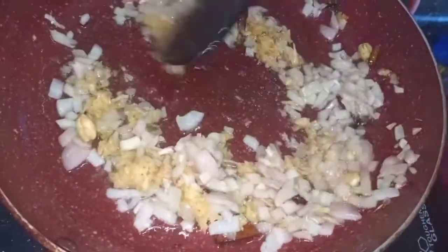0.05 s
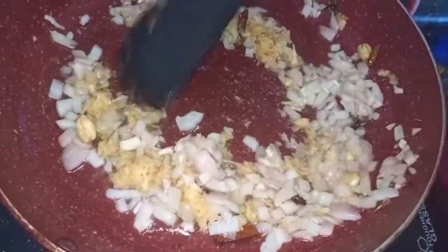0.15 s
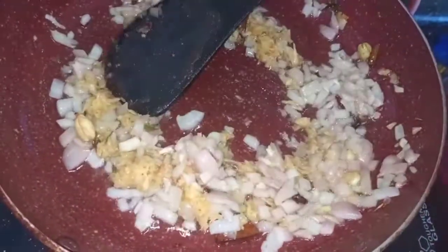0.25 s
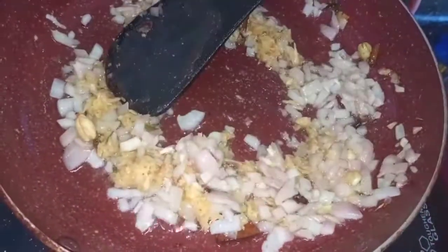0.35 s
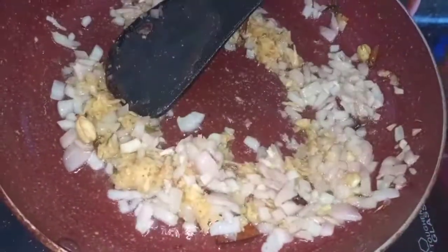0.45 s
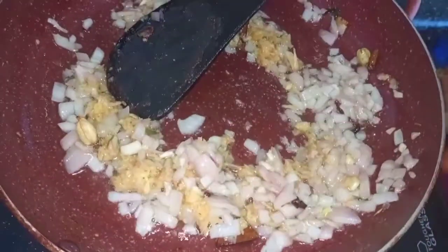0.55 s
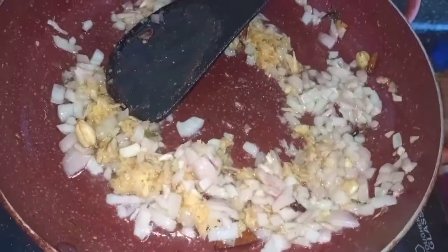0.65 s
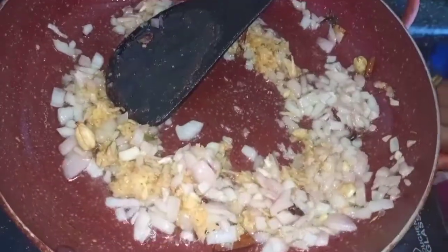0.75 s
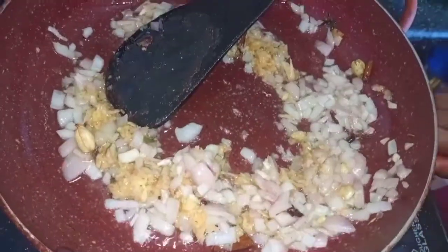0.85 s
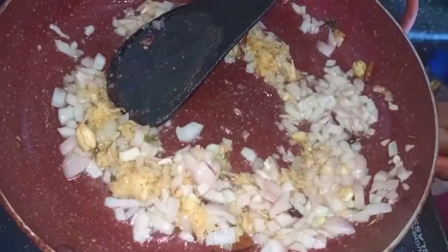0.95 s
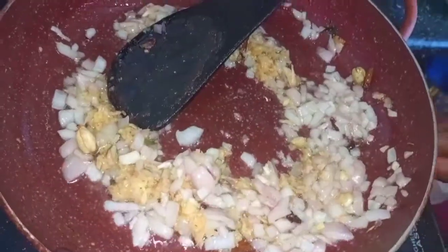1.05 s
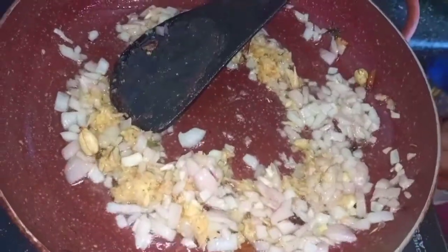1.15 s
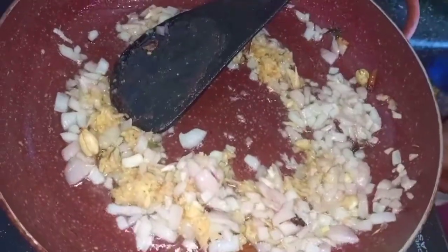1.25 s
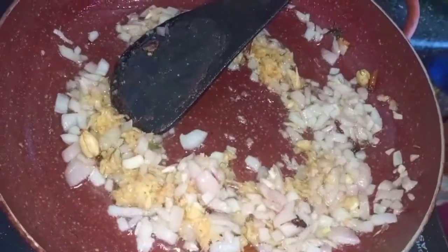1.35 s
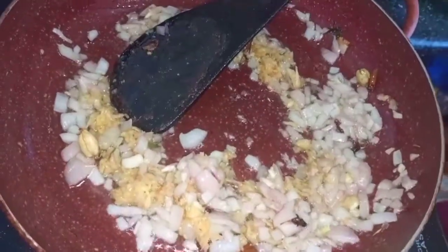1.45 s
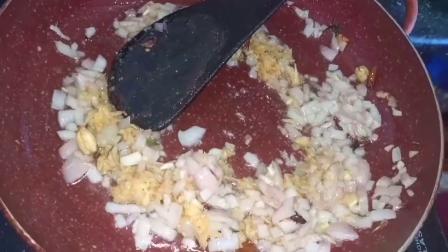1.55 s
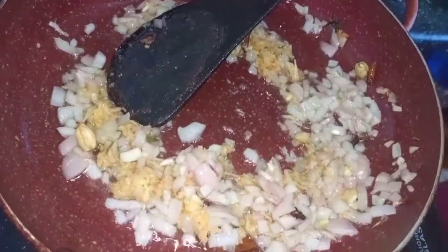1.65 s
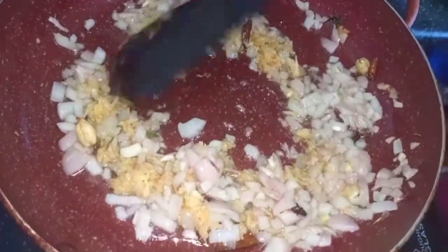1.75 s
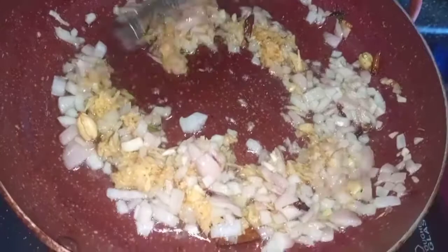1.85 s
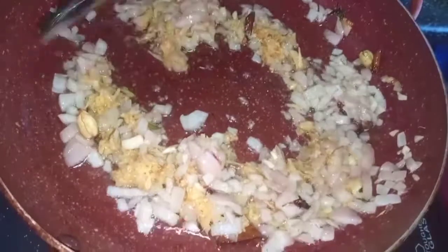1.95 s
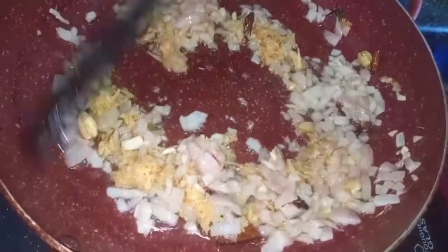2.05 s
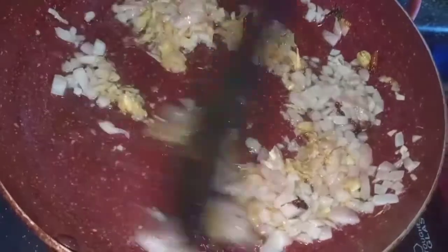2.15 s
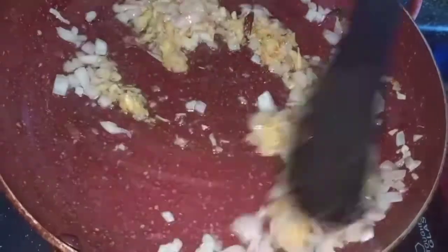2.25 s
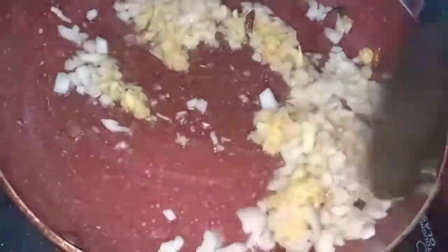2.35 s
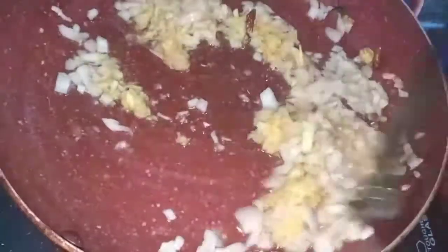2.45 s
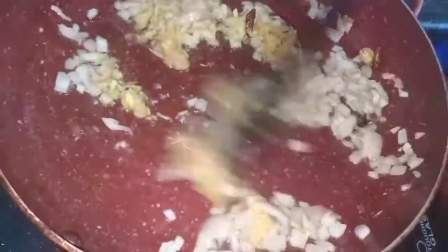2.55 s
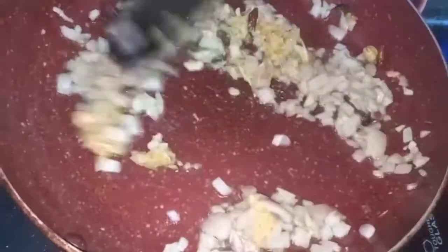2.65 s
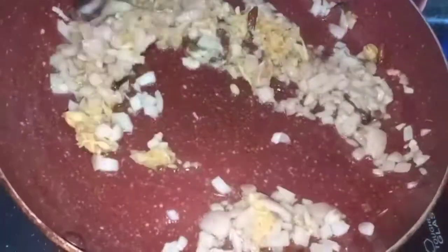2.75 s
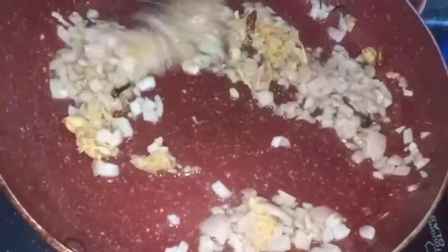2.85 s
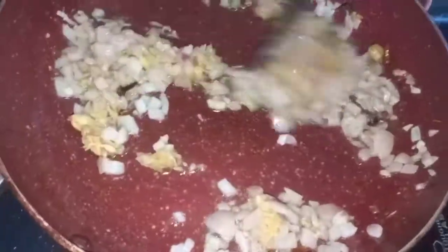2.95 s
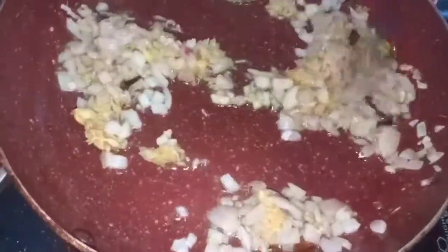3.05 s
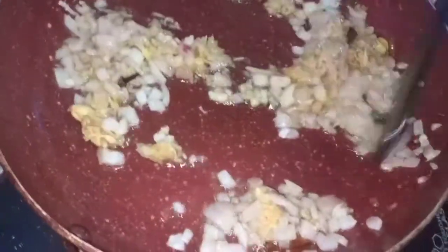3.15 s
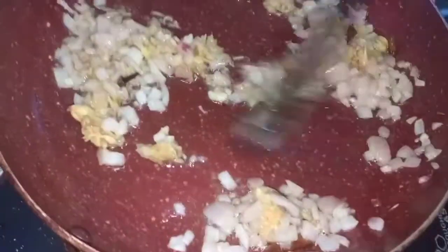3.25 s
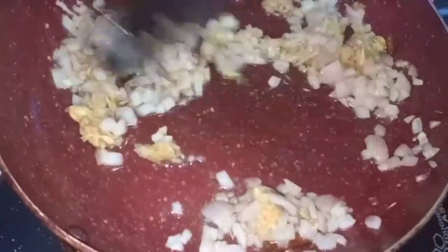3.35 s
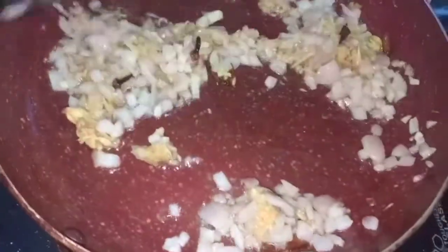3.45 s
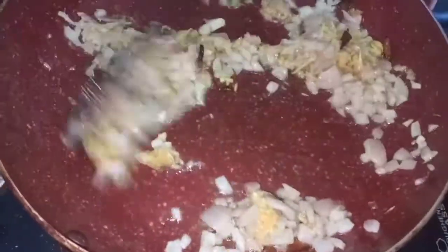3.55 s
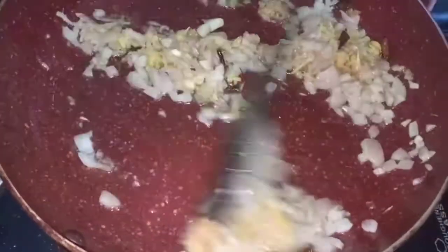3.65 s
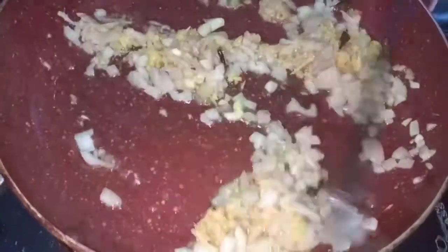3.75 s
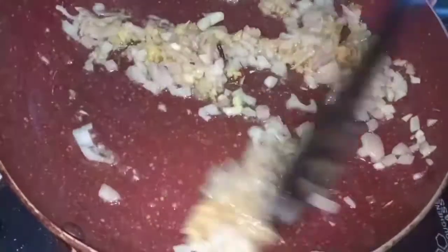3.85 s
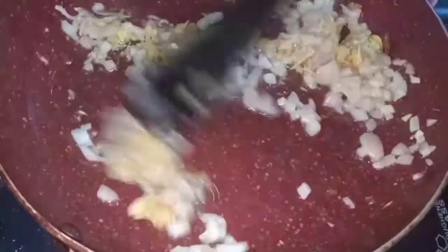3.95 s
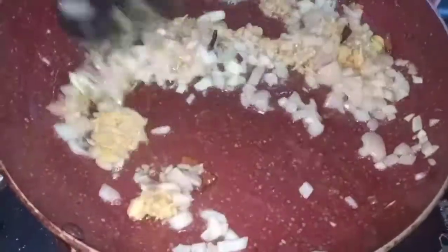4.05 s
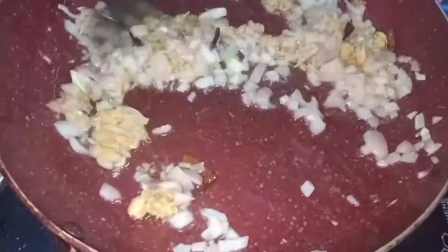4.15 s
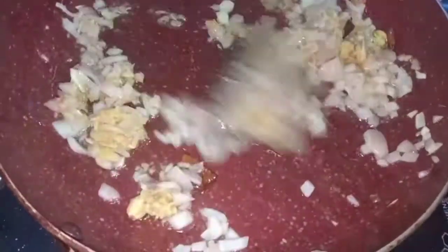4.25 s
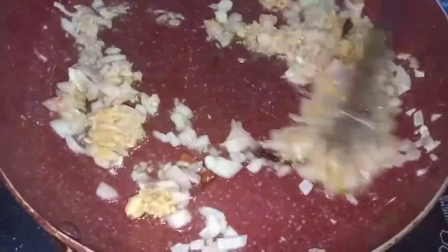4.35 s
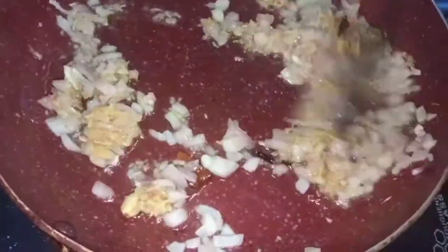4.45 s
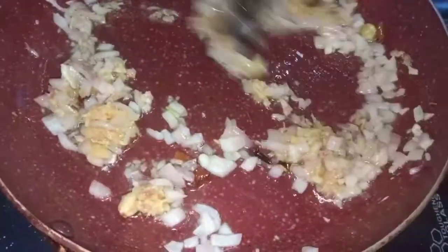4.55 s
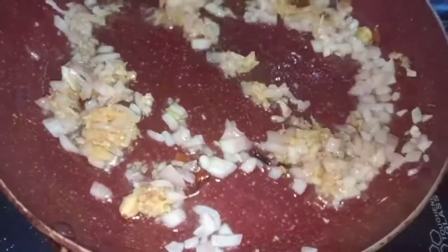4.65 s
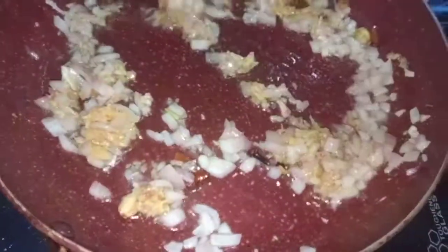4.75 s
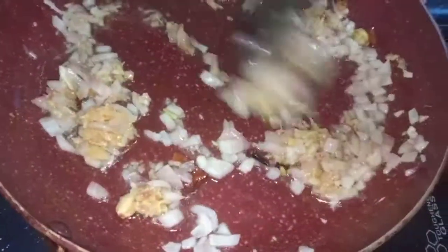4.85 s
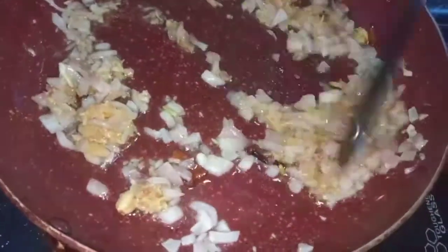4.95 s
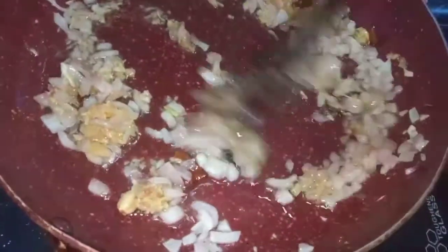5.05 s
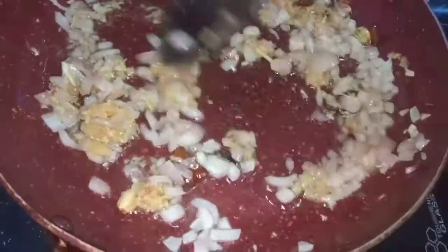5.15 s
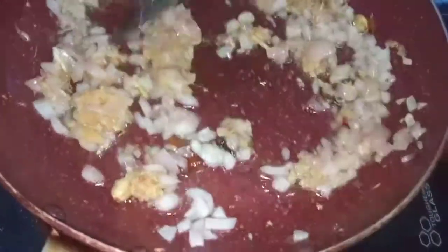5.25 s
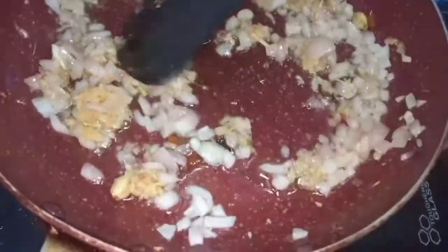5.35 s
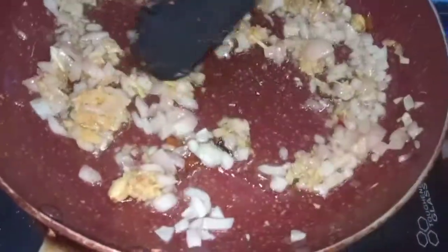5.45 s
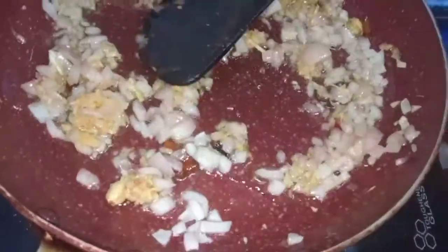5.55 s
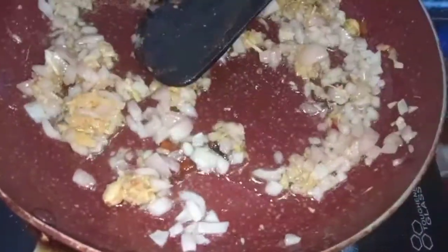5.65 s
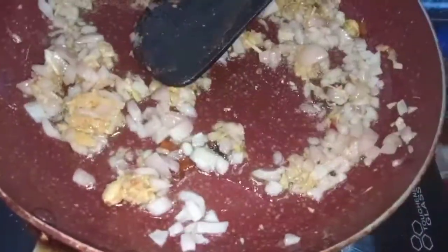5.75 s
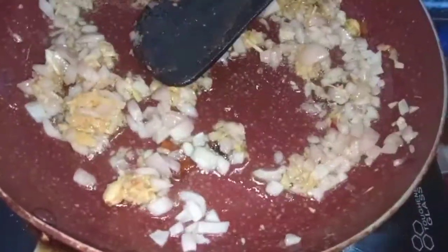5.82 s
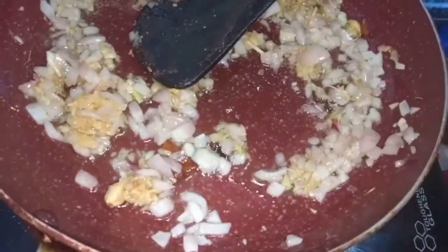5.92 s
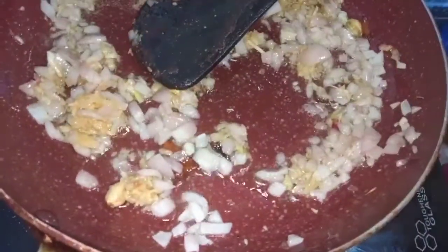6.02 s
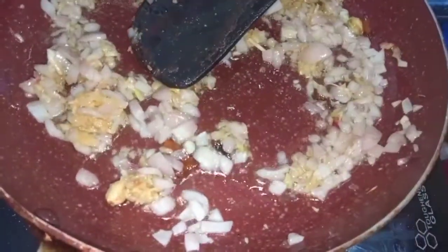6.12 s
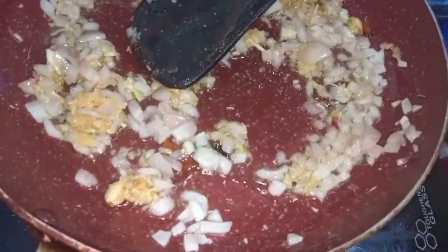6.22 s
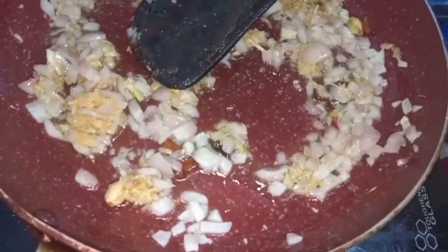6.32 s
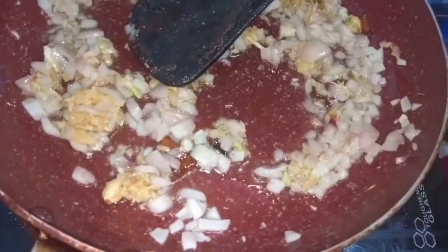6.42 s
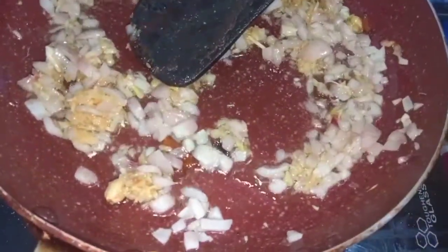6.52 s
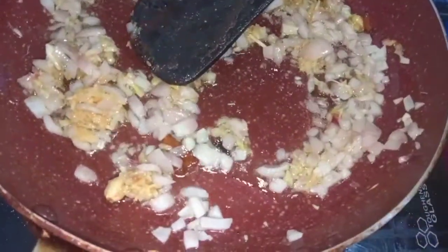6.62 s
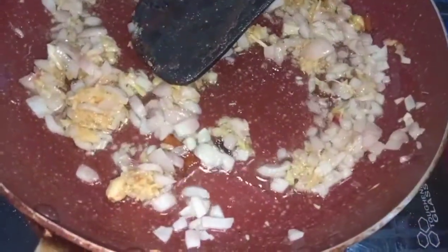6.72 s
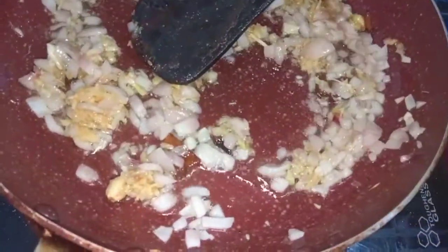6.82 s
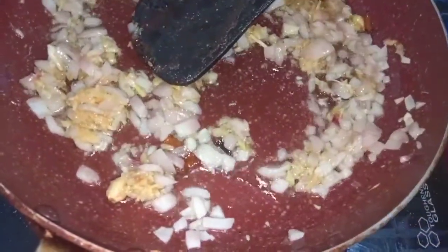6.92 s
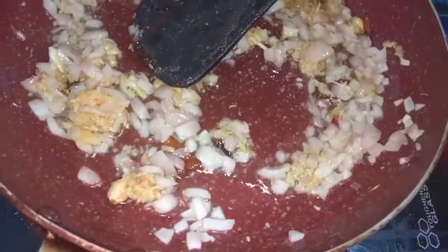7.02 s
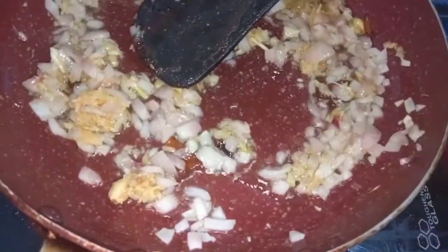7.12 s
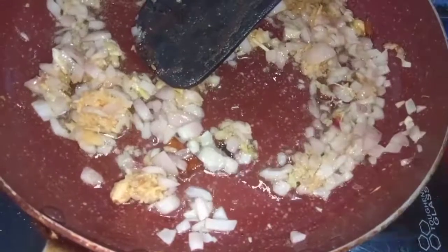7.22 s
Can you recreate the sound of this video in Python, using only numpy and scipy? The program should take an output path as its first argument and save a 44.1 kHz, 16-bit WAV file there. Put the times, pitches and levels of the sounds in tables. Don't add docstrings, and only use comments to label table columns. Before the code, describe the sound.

Steady wet sizzle of chopped onion frying in oil, with sharp spatula knocks, short scrapes and a late hollow clatter, heard close up.

```python
import sys
import numpy as np
from scipy import signal
from scipy.fft import rfft, irfft
from scipy.io import wavfile
from scipy.ndimage import uniform_filter1d, minimum_filter1d

SR = 44100
rng = np.random.default_rng(int(sys.argv[2]) if len(sys.argv) > 2 else 0)


def nominal_scale(level):
    x = np.asarray(level, float) / 20
    return 10 ** x


def persist_wave(psi):
    counts = np.round(np.clip(psi, -1, 1) * 32767).astype(np.int16)
    wavfile.write(sys.argv[1], SR, np.atleast_2d(counts).T)


N = 321224

# t [s], position among the seven grips [0-6]
GRIP_PATH = [(0, 0), (2.58, 0), (2.84, 1), (3.14, 1), (3.36, 2), (3.58, 2), (3.78, 3), (4.4, 3), (4.75, 4),
             (5.25, 4), (5.5, 5), (6.5, 6), (7.28, 6)]
# f [Hz], level [dB per Hz]
PORT_BODY = [
    [(530, -47.5), (900, -26), (1400, -26), (2270, -2.5), (2850, -13.5), (3700, -17), (4400, -31),
     (7150, -34)],
    [(530, -56), (900, -19), (1100, -16.5), (2200, -4), (2800, 5.5), (5500, -15), (7150, -67)],
    [(530, -25), (900, -6), (1260, -13), (1930, -2), (2800, 0.5), (5500, -13), (7150, -72)],
    [(530, -23.5), (900, -21.5), (1700, -12), (1980, -6.5), (3260, -1.5), (4000, -4.5), (5500, -33),
     (7150, -33)],
    [(530, -25), (900, -16), (1640, -10), (1820, -4.5), (2300, -1.5), (3240, 4), (5500, -9.5), (7150, -42)],
    [(530, -37), (900, -17), (1450, -18.5), (2070, -2), (2850, 1), (3940, -2), (5500, -20), (7150, -62)],
    [(530, -49), (900, -29), (1730, -21), (2850, -5.5), (3970, -12.5), (5500, -37), (7150, -66)],
]
# f [Hz], level [dB per Hz]
PORT_TREBLE = [
    [(4750, -17), (5610, -3.5), (6150, -7.5), (6640, 1.5), (7570, -14.5), (8340, -5.5), (9320, -14.5),
     (10200, -6), (11300, -11.5), (12200, -20.5)],
    [(2710, -11), (5720, -5.5), (6910, 2.5), (7800, -11), (9710, 0), (11600, -4), (13900, -14),
     (15500, -25)],
    [(4600, -1), (5200, -13), (6940, -6), (8010, -2), (8470, -3), (10200, -15.5), (13300, -8), (15500, -11)],
    [(2710, -35), (4600, -0.5), (5300, -18), (6180, -15.5), (7690, -18), (11400, -15), (13200, -22),
     (15500, -36)],
    [(2710, -39), (4600, -3), (5200, -23), (5930, -7.5), (7160, 0.5), (8600, -14), (11800, -7.5),
     (15500, -25)],
    [(2710, -45), (4600, -12), (5550, -15), (6870, 4.5), (7230, 1), (8680, -18.5), (11800, -14),
     (15500, -23)],
    [(4910, -18), (5580, -10.5), (6430, -9), (6840, -2), (7460, 3), (8550, -14), (11500, -6), (15500, -25)],
]
SPLIT_HZ = 3930
# sizzle treble level [dB], flame level [dB]
GRIP_LEVELS = [(-55, -46.5), (-50.5, -43), (-47, -44.5), (-51.5, -47.5), (-51.5, -52.5), (-46.5, -51),
               (-50, -49)]
GRIP_ECHO = [1, 1.5, 1.5, -0.5, -2.5, 4, -2]

# t [s], level [dB]
FRYING_VIGOUR = [(0, -40.5), (.28, -41.5), (.5, -41), (2.09, -41), (2.37, -42.5), (2.49, -42.5), (2.8, -36),
                 (2.97, -45), (3.28, -42.5), (3.42, -49.5), (3.6, -40), (3.79, -42.5), (4.05, -33.5),
                 (4.34, -39), (4.83, -41), (5.56, -37), (5.82, -39), (7.28, -38)]
USUAL_DB, TREBLE_FOLLOWS = -39.5, 0.44
# t [s], body gain [dB], treble gain [dB], fading time [s]
FLARE_UPS = [(.1, 7.5, 10.5, 0.017), (0.384, 14, -10, 0.016), (2.125, 4, 2.5, 0.28), (3.0, 11, 3.5, 0.18),
             (3.63, 10.5, 4.5, 0.22), (4.2, 5, 4, 0.011), (4.64, 7.5, 7, 0.065), (5.25, -2, 1, 0.02),
             (.7, 2.5, 2, 0.044), (.92, 1, 3, 0.024), (1.85, 1.5, 1, 0.044), (2.21, 3.5, 0, 0.046),
             (2.27, 5.5, -0.5, .03), (2.34, 3, -1, .04), (2.78, 0, 1.5, 0.023), (4.07, 3.5, 4, 0.059),
             (4.4, 1, -1, 0.034), (4.55, 3.5, 4, 0.04), (5.43, 3, -1, 0.049), (6.1, 2.5, 3, 0.046),
             (6.52, 1.5, -1, 0.028), (7.02, 0, 1.5, 0.022), (7.11, 1.5, 0, .03), (5.54, 0, -1.5, 0.077),
             (5.7, 0.5, 2, 0.22), (6.729, 10, 16, 0.018), (6.768, 11.5, 0, 0.02), (6.89, 1, 2.5, 0.043),
             (7.18, 1.5, 0.5, 0.036)]
FLARE_RISE_S = 0.013
BOILING_DB = 2.0
# f [Hz], level [dB per Hz]
HUM_SPECTRUM = [(18, -41), (30, -8.5), (48, -24), (66, -10.5), (108, 3), (140, -10), (194, -1.5),
                (252, -21.5), (299, -18.5), (371, -15), (414, -17.5), (590, -18.5), (1200, -19.5),
                (1560, -12.5), (2640, -120)]
# t [s], level above the flame [dB]
STOVE_JOLTS = [(.38, -5), (1.3, 3), (2.279, 9.5), (2.551, 6), (3.33, 1), (4.0, 14), (4.2, 5), (4.56, 5.5),
               (5.14, 10), (5.5, 1.5), (5.76, 6)]
JOLT_RISE_S, JOLT_FADE_S = 0.013, 0.05
# start t [s], length [s], level above the resting rustle [dB]
BLADE_DRAGS = [
    (.28, 0.22, -13),
    (2.1, 0.99, 23),
    (2.961, 0.17, 30),
    (3.592, 0.11, 35),
    (3.9, 0.21, 25),
    (5.6, 0.12, 14),
    (6.74, 0.31, -2),
]
RUSTLE_DB, DRAG_PEAK = -63.5, 0.41

# t [s], peak level [dB], f [Hz]
SMALL_SPITS = [(0.0965, -32, 6800), (0.2996, -9, 6100), (2.2145, -24, 8400), (2.5082, -26, 6400),
               (2.899, -17, 12400), (2.9097, -21, 6800), (3.29, -21, 7100), (3.512, -28, 7700),
               (3.6202, -36, 7800), (4.636, -8, 11000), (4.6358, 6, 3400), (5.4026, -31, 6850),
               (5.4725, -28, 7060), (5.71, -10, 6960), (5.7957, -19, 7300), (5.8396, -21, 7030),
               (6.0701, -21, 7230), (6.0903, -13, 7900), (6.318, -24, 6970), (6.343, -18, 7380),
               (6.5136, -17, 6700), (6.5685, -26, 7010), (6.725, -6, 8900), (6.766, -26, 7700),
               (7.007, -23, 7490), (7.113, -20, 7400), (7.173, -11, 3900), (.4796, -32, 6630),
               (0.652, -26, 6660), (.8912, -29, 6480), (.927, -26, 5000), (1.218, -35, 8400),
               (1.326, -32, 10100), (1.3347, -24, 8430), (1.4489, -32, 5350), (1.4819, -29, 5680),
               (1.7123, -31, 6700), (1.9478, -33, 6700), (2.2995, -32, 6610), (3.228, -28, 6000),
               (3.256, -30, 9800), (3.29, -24, 4500), (3.29, -30, 12500), (2.852, -31, 11300),
               (4.005, -25, 7800), (4.02, -28, 9000)]
# t [s], peak level [dB]
LARGE_SPITS = [(0.927, -17), (1.4522, -19), (1.847, -17), (1.849, -13), (1.9187, -19), (2.206, -13),
               (2.263, -33), (2.5955, -15), (2.7836, -18), (1.0944, -26), (4, -19), (4.095, -8),
               (4.4637, -12), (4.6358, -9), (4.637, -9), (5.2196, -20), (5.2421, -13), (5.4065, -15.5),
               (5.5295, -19.5), (5.7822, -20), (6.089, -14), (6.2126, -13.5), (6.365, -22), (6.5205, -15),
               (6.5404, -18), (6.6664, -15), (6.726, -6.5), (6.8801, -13.5), (6.9067, -20), (6.918, -21),
               (6.922, -19), (6.977, -10.5), (7.017, -17), (6.7305, -14), (2.266, -8.5), (4.074, -8),
               (4.126, -13), (7.173, -9.5), (7.199, -9.5)]
SPLASH_SHARE = 0.16

# t [s], crack peak [dB], crack f [Hz], pan thud above crack [dB], pan ring above crack [dB]
EDGE_SOFT_KNOCKS = [(0.0979, -10, 2500, -64, -22), (1.0952, -20, 950, -18, -30),
                    (1.1115, -29, 624, -22, -30), (1.1195, -35, 700, -20, -30),
                    (3.2902, -11, 1900, -20, -14), (1.4226, -30, 2300, -29, 4.5),
                    (1.4547, -19, 2140, -19, -3), (2.5451, -34, 2240, 5.5, -30),
                    (3.2982, -9.5, 1560, -8, -2.5), (3.583, -27, 1500, -6, 7), (3.592, -29, 1500, 6, 10),
                    (3.607, -25, 1300, -5, -3), (3.6597, -6, 2320, -26, -10), (3.9113, -6, 1950, -13, -9),
                    (3.9128, -8, 1700, -30, -10), (3.9177, -8, 1930, -13, -5.5),
                    (4.342, -17, 2240, -33, -28), (5.1222, -21, 1500, -5, 2), (5.3411, -29, 2800, -9.5, -1),
                    (5.501, -18, 2460, -52, -21), (5.629, -22, 2740, -15.5, -19)]
BLADE_FLAT_KNOCKS = [
    (.2980, 12, 2200, -50, -34),
    (.3771, -2.5, 2230, -25, -17),
]
EDGE_HARD_KNOCKS = [
    (2.1143, 9, 1900, -33, -8),
    (2.9009, 8, 1980, -25, -8),
    (4.2424, 7, 1950, -25, -10),
]
FLAT_CYCLES, HARD_CYCLES, SOFT_CYCLES = 2.34, 0.65, 0.4
# f [Hz], level [dB], t60 [s]
STAND_MODES = [(190, -16, 0.16), (266.7, -4, 0.17), (314, -1.5, 0.15), (390, -14, 0.11)]
# f [Hz], level [dB], t60 [s]
WALL_MODES = [(555, -14, .035), (628, -10, .035), (710, -11, .06), (860, -10, .035), (996, -10, .035),
              (1330, -12, .035), (1560, -14, .03), (1945, -18, .05), (2390, -17, .025), (2610, -17, .025)]
# t [s], level [dB], f [Hz], t60 [s]
BARE_METAL_NOTES = [(1.0955, -21, 2150, .015), (0.0982, -27, 720, 0.03), (.0982, -24, 1000, .015),
                    (0.11, -23, 2460, .015), (.098, -20.5, 1520, 0.013), (.299, -22, 720, 0.09),
                    (.303, -20, 2180, 0.22), (.303, -23, 2000, 0.17), (0.299, -21, 1390, 0.046),
                    (.299, -19, 790, 0.02), (.2985, -3, 3200, 0.0066), (.3775, -14.5, 3300, 0.01),
                    (.378, -16, 1200, 0.012), (.3775, -20, 3800, .006), (.386, -32, 2330, .03),
                    (3.299, -11.5, 628, 0.026), (3.2985, -11, 1550, 0.015), (3.2985, -24, 3200, .01),
                    (3.2985, -18, 2430, 0.019), (3.301, -24, 300, .06), (3.594, -21, 620, .025),
                    (4.243, -6, 2700, 0.014), (4.243, -7, 3400, 0.006), (4.244, -11, 1920, .02),
                    (4.243, -7.5, 950, 0.015), (4.246, -14.5, 604, 0.032), (2.902, -14, 2540, 0.02),
                    (2.9095, -15, 2600, .025), (2.902, -18, 711, 0.07), (2.902, -20, 640, .04),
                    (2.902, -24, 1001, .1), (2.1155, -18, 940, .04), (2.1155, -17, 711, .08),
                    (2.1155, -20, 624, .08), (2.123, -14, 2500, .035), (3.913, -19.5, 1948, 0.3),
                    (3.916, -28, 1338, 0.13), (3.913, -21, 2600, 0.08), (3.917, -19, 640, .04),
                    (5.123, -20, 650, .03), (2.1147, -11, 1050, .012), (2.9012, -16, 1050, .01),
                    (3.584, -22, 700, .02), (.39, -40, 520, .15), (.39, -36, 680, .16)]
ROCK_S, HARD_TOP_HZ, BLADE_TOP_HZ = .003, 3100, 4100
# t [s], rms level [dB], f [Hz], length [s]
EDGE_RUBS = [(1.41, -37.5, 720, 0.12), (1.825, -27, 2750, 0.059), (2.4, -33, 2700, 0.07),
             (3, -45, 400, 0.08), (2.63, -22, 2800, 0.07), (2.634, -33.5, 1320, 0.068),
             (2.965, -25.5, 2900, 0.059), (3, -23.5, 2320, 0.054), (3.613, -33, 3600, 0.032),
             (5.105, -65, 900, 0.018), (5.302, -42, 520, 0.13), (6.731, -16, 2900, 0.028),
             (6.752, -17, 2400, 0.016), (6.762, -22, 2880, 0.042), (6.79, -35, 2500, 0.042),
             (6.725, -28, 2700, 0.024), (6.755, -28, 3900, 0.025), (6.775, -26, 3400, 0.04),
             (2.33, -28, 3200, 0.027), (4.55, -40.5, 307, 0.046), (3.168, -62, 900, 0.079),
             (3.3, -30, 1900, .07), (2.14, -31, 1600, .13), (.39, -38, 1400, .12), (6.82, -29, 1300, .025),
             (6.9, -38, 800, .1), (6.733, -24, 420, .02), (2.95, -36, 1100, .08), (3.59, -31, 1400, .05),
             (3.582, -29, 1900, .02), (1.824, -42, 1060, 0.037)]

# low f [Hz], high f [Hz], t60 [s], level [dB]
KITCHEN_BANDS = [(147, 270, 0.31, -13), (305, 650, 0.28, -15), (648, 1300, 0.27, -11),
                 (1450, 3600, 0.17, -32), (2800, 4400, 0.15, -10.5), (4500, 12000, 0.64, -19)]
BLOW_LOW_HZ = 213
# t [s], f [Hz], rms level [dB]
CAVITY_GLIDE = [
    (3.16, 6700, -85),
    (3.23, 6800, -60),
    (3.35, 7900, -58),
    (3.6, 8050, -57),
    (3.71, 7000, -57),
    (3.8, 6860, -85),
]
CAVITY_WIDTH_HZ = 500
# t [s], peak level [dB]
VESSEL_BLOWS = [(6.736, -14), (6.7395, -18), (6.746, -19), (6.7505, -23), (6.759, -16), (6.761, -15),
                (6.766, -9), (6.771, -12), (6.776, -14), (6.782, -21), (6.791, -31), (6.799, -30),
                (6.811, -42), (6.822, -39), (6.836, -25), (6.847, -32), (6.862, -42), (6.921, -33)]
# f [Hz], level [dB], t60 [s]
VESSEL_MODES = [(425, -18, 0.1), (512, -8, 0.07), (555, -4, 0.07), (628, -4, 0.05), (663, -4, 0.06),
                (760, -7, 0.03), (900, -4, 0.03), (1010, -10, 0.02), (1220, -5, 0.02), (1580, -5, 0.015),
                (2020, -12, 0.021), (2450, -3, 0.037), (3230, -14, 0.017)]
VESSEL_LOW_HZ = 300

MIC_LOW_HZ, TOP_HZ = 66.6, 15780
CEILING_DB, RELEASE_DB_PER_S, AHEAD_S = -.6, 120, .016


def rms_one(x):
    return x / np.sqrt(np.mean(x ** 2) + 1e-20)


def in_time(rows):
    s, *columns = np.transpose(rows)
    return [np.interp(np.arange(N) / SR, s, c) for c in columns]


def by_grip(values):
    return np.interp(in_time(GRIP_PATH)[0], np.arange(len(values)), values)


def surge(at, rise_s, fade_s):
    age = np.arange(N) / SR - at
    rise = np.maximum(1 + age / max(rise_s, 1e-3), 0)
    fade = np.exp(-np.maximum(age, 0) / max(fade_s, 1e-3))
    return np.where(age < 0, rise, fade)


def drift(rate):
    r = np.exp(-2 * np.pi * rate / SR)
    noise = rng.standard_normal(N + SR)
    return rms_one(signal.lfilter([1], [1, -2 * r, r * r], noise)[SR:])


def band(x, low_hz, high_hz):
    return signal.sosfilt(signal.butter(2, [low_hz, high_hz], "band", fs=SR, output="sos"), x)


def lowpass(x, hz):
    return signal.sosfilt(signal.butter(4, hz, fs=SR, output="sos"), x)


def highpass(x, hz):
    return signal.sosfilt(signal.butter(4, hz, "high", fs=SR, output="sos"), x)


def colour(x, spectrum, size=4096):
    hz, level_db = np.transpose(spectrum)
    grid = np.maximum(np.arange(size // 2 + 1) * SR / size, 1)
    cepstrum = irfft(np.log(nominal_scale(np.interp(np.log(grid), np.log(hz), level_db))))
    cepstrum[1:size // 2] *= 2
    cepstrum[size // 2 + 1:] = 0
    response = irfft(np.exp(rfft(cepstrum)))
    return signal.oaconvolve(x, response)[:len(x)]


def clicks(seconds, gains):
    out = np.full(N, 1e-18)
    np.add.at(out, np.round(np.asarray(seconds) * SR).astype(int), gains)
    return out


def ring(x, hz, t60):
    r, w = nominal_scale(-60 / (t60 * SR)), 2 * np.pi * hz / SR
    return signal.lfilter([0, np.sin(w)], [1, -2 * r * np.cos(w), r * r], x)


def strike(seconds, level_db, modes, spread_db):
    chance = rng.standard_normal((len(seconds), len(modes)))
    out = 0
    for k, (hz, db, t60) in enumerate(modes):
        blows = clicks(seconds, nominal_scale(level_db + db + spread_db * chance[:, k]))
        out = out + ring(blows, hz, t60)
    return out


def grains(per_s, size_db):
    sizes = nominal_scale(size_db * np.minimum(rng.exponential(1, N), 5.0))
    sizes = sizes * rng.choice([-1, 1], N)
    return rms_one(sizes * (rng.random(N) < per_s / SR))


def through_port(x, colours, side):
    grip, = in_time(GRIP_PATH)
    split = signal.butter(4, SPLIT_HZ, side, fs=SR, output="sos")
    out = 0
    for k, spectrum in enumerate(colours):
        answer = signal.sosfilt(split, colour(clicks([0], 1)[:1024], spectrum))
        heard = signal.oaconvolve(x, answer / np.linalg.norm(answer))[:N]
        out = out + np.clip(1 - abs(grip - k), 0, 1) * heard
    return out


def frying():
    vigour_db, = in_time(FRYING_VIGOUR)
    treble_db = by_grip([row[0] for row in GRIP_LEVELS]) + TREBLE_FOLLOWS * (vigour_db - USUAL_DB)
    flares = sum(np.outer([body, treble], surge(at, FLARE_RISE_S, fade))
                 for at, body, treble, fade in FLARE_UPS)
    return vigour_db + flares[0], treble_db + flares[1]


def sizzle(body_db, treble_db):
    boiling = drift(13.3)
    large = grains(1500 * nominal_scale(4.0 * drift(40)), size_db=3.5) * nominal_scale(BOILING_DB * boiling)
    small = 0
    edges = np.geomspace(4000, 17000, 6)
    for low_hz, high_hz in zip(edges, edges[1:]):
        bursts = grains(900 * nominal_scale(6.9 * drift(50)), size_db=3.0)
        small = small + band(bursts, low_hz, high_hz)
    small = rms_one(small) * nominal_scale(1.0 * boiling)
    body = large + nominal_scale(3.5) * rng.standard_normal(N)
    treble = 0.77 * large + small + nominal_scale(1.5) * rng.standard_normal(N)
    body = through_port(rms_one(body), PORT_BODY, "low")
    treble = through_port(rms_one(treble), PORT_TREBLE, "high")
    return nominal_scale(body_db + 3.0) * body + nominal_scale(treble_db - 1.5) * treble


def hum():
    level_db = by_grip([row[1] for row in GRIP_LEVELS])
    level_db = level_db + sum(db * surge(at, JOLT_RISE_S, JOLT_FADE_S) for at, db in STOVE_JOLTS)
    noise = rms_one(colour(rng.standard_normal(N), HUM_SPECTRUM))
    return nominal_scale(level_db + 1.5 * drift(8.2)) * noise


def dragging():
    t = np.arange(N) / SR
    return RUSTLE_DB + sum(np.interp(t, [at, at + DRAG_PEAK * length, at + length], [0, db, 0])
                           for at, length, db in BLADE_DRAGS)


def scrape(level_db):
    rough = grains(900, size_db=5.0)
    modes = STAND_MODES[1:] + WALL_MODES[:5]
    sound = sum(nominal_scale(db) * ring(rough, hz, 0.61 * t60) for hz, db, t60 in modes)
    return nominal_scale(level_db - 3.5) * rms_one(sound)


def spits():
    out = np.zeros(N)
    spray = rng.standard_normal((len(LARGE_SPITS), 200)) * np.exp(-np.arange(200) / 40.0)
    splashes = SPLASH_SHARE * spray + clicks([0], 0.77)[:200]
    for (at, db), splash in zip(LARGE_SPITS, splashes):
        out[round(at * SR):][:200] += nominal_scale(db + 7.5) * splash / np.linalg.norm(splash)
    out = through_port(out, PORT_BODY, "low")
    bursts = rng.standard_normal((len(SMALL_SPITS), 300)) * np.exp(-np.arange(300) / 53.0)
    for (at, db, hz), burst in zip(SMALL_SPITS, bursts):
        tick = band(burst, 0.86 * hz, 1.105 * hz)
        out[round(at * SR):][:300] += nominal_scale(db - 12.0) * tick / abs(tick).max()
    return out


def knocks():
    tables = [BLADE_FLAT_KNOCKS, EDGE_HARD_KNOCKS, EDGE_SOFT_KNOCKS]
    rows = np.vstack(tables)
    decays = np.repeat([FLAT_CYCLES, HARD_CYCLES, SOFT_CYCLES], [len(table) for table in tables])
    s, peak_db, _, thud_db, ring_db = rows.T
    rock = np.hanning(round(ROCK_S * SR))
    thud = strike(s + 0.0027, peak_db + thud_db + 2.0, STAND_MODES, spread_db=1)
    thud = signal.oaconvolve(thud, rock / rock.sum())[:N]
    out = signal.lfilter([.004], [1, -.996], thud * 12.2)
    out += strike(s, peak_db + ring_db - 9.0, WALL_MODES, spread_db=3)
    out += sum(ring(clicks([at], nominal_scale(db)), hz, t60) for at, db, hz, t60 in BARE_METAL_NOTES)
    t = np.arange(SR // 50) / SR
    for (at, db, hz, *_), cycles in zip(rows, decays):
        age = 1.5 * t * hz / cycles
        crack = (age / 2) ** 2 * np.exp(2 - age) * np.sin(2 * np.pi * hz * t)
        if cycles == HARD_CYCLES:
            crack = lowpass(crack, HARD_TOP_HZ)
        out[round(at * SR):][:len(t)] += nominal_scale(db) * crack
    return lowpass(out, BLADE_TOP_HZ)


def kitchen(x):
    t = np.arange(SR // 2) / SR
    echo = 0
    for low_hz, high_hz, t60, db in KITCHEN_BANDS:
        tail = band(rng.standard_normal(len(t)), low_hz, high_hz)
        tail = tail * nominal_scale(-60 * t / t60) * (1 - np.exp(-t / 0.00026))
        width = np.sqrt(2 * (high_hz - low_hz) / SR)
        echo = echo + nominal_scale(db) * tail / np.linalg.norm(tail) * width
    return signal.oaconvolve(x, echo)[:N]


def rubs():
    out, rough = np.zeros(N), grains(3300, size_db=5.0)
    for at, db, hz, length in EDGE_RUBS:
        span = slice(round(at * SR), round((at + length) * SR))
        stroke = rms_one(band(rough[span], 0.68 * hz, 0.93 * hz))
        out[span] += nominal_scale(db - 7.5) * stroke * np.hanning(span.stop - span.start)
    return out


def cavity():
    hz, level_db = in_time(CAVITY_GLIDE)
    narrow = signal.butter(2, CAVITY_WIDTH_HZ / 2, fs=SR, output="sos")
    hiss = signal.sosfilt(narrow, rng.standard_normal((2, N)))
    phase = 2 * np.pi * np.cumsum(hz) / SR
    return nominal_scale(level_db) * rms_one(hiss[0] * np.cos(phase) + hiss[1] * np.sin(phase))


def clatter():
    s, peak_db = np.transpose(VESSEL_BLOWS)
    dying = signal.lfilter([1], [1, -nominal_scale(-60 / (.42 * SR))], clicks(s, nominal_scale(peak_db - 63)))
    chatter = dying * grains(1500, size_db=1.5)
    rattle = strike(s, peak_db, VESSEL_MODES, spread_db=6.5)
    rattle = rattle + sum(nominal_scale(db + 19.0) * ring(chatter, hz, t60) for hz, db, t60 in VESSEL_MODES)
    return highpass(nominal_scale(-8.0) * rattle, VESSEL_LOW_HZ)


def scene():
    blows = knocks() + clatter() + rubs()
    echo = nominal_scale(7.5 + by_grip(GRIP_ECHO)) * kitchen(blows)
    blows = highpass(blows + echo, BLOW_LOW_HZ)
    mix = sizzle(*frying()) + hum() + scrape(dragging()) + spits() + blows + cavity()
    return mix[None]


def band_limit(x):
    return signal.sosfilt(signal.butter(12, 16440, fs=SR, output="sos"), x)


def record(dry):
    bass_cut = signal.butter(2, MIC_LOW_HZ, "high", fs=SR, output="sos")
    top_cut = signal.cheby2(22, 50, TOP_HZ, fs=SR, output="sos")
    heard = signal.sosfilt(np.vstack([bass_cut, top_cut]), dry)
    ahead = round(AHEAD_S * SR)
    over_db = np.maximum(20 * np.log10(abs(heard[0]) + 1e-9) - CEILING_DB, 0)
    early = -minimum_filter1d(-over_db, ahead, origin=-(ahead // 2))
    release = RELEASE_DB_PER_S * np.arange(N) / SR
    held = np.maximum.accumulate(early + release) - release
    mix = heard * nominal_scale(-uniform_filter1d(held, size=101, origin=50))
    return band_limit(mix)


dry = scene()
out = record(dry)
persist_wave(out)
```